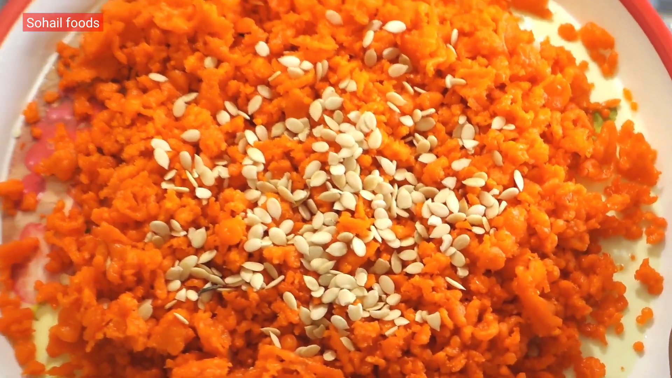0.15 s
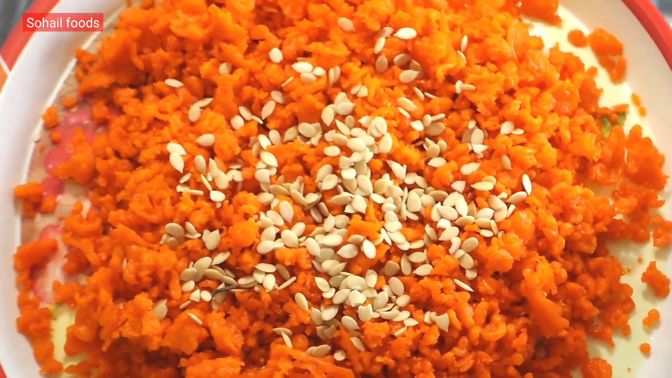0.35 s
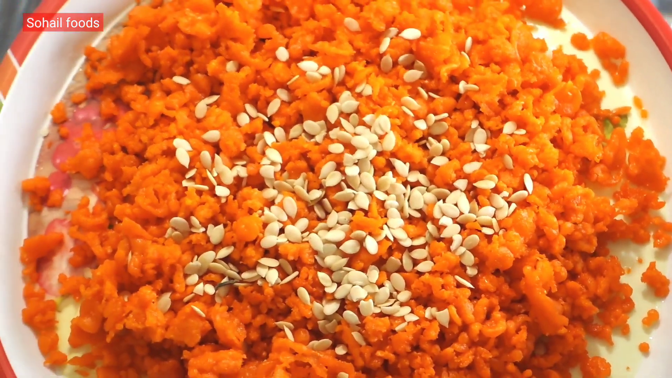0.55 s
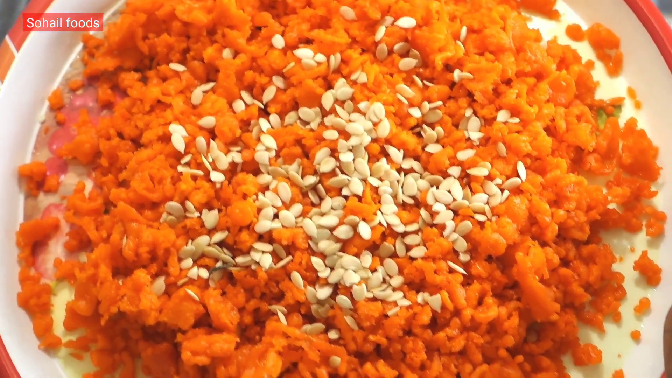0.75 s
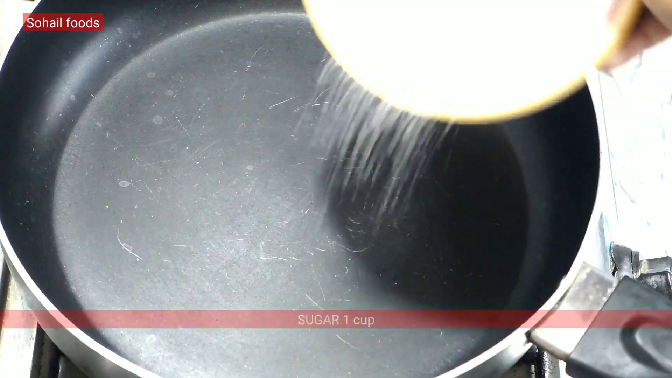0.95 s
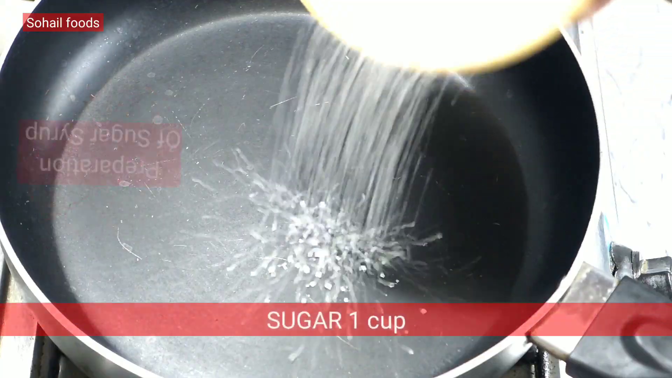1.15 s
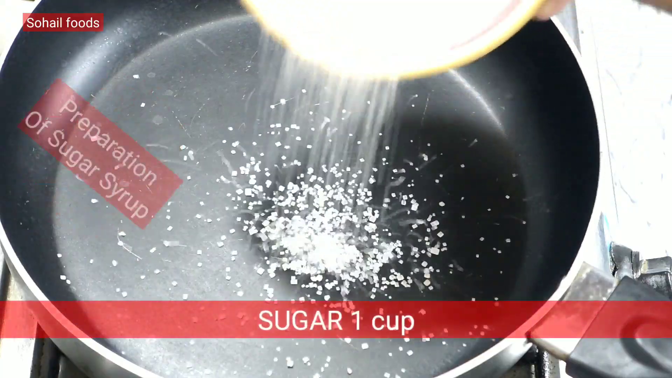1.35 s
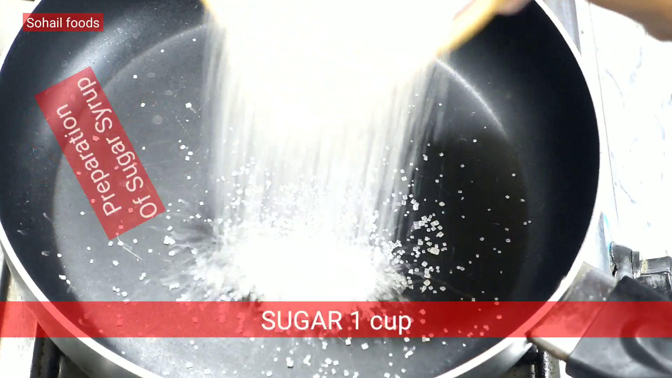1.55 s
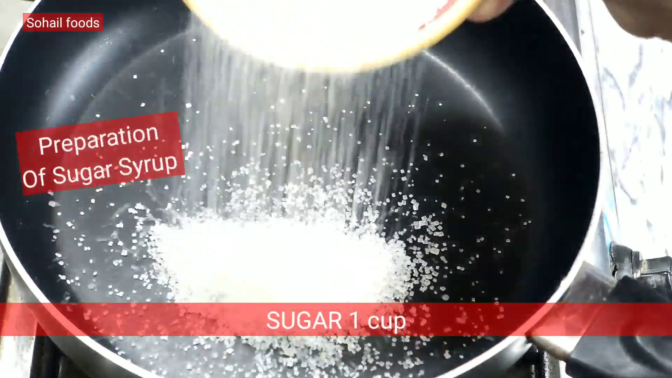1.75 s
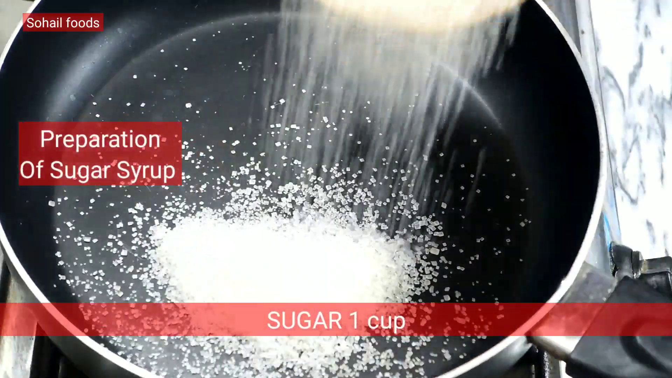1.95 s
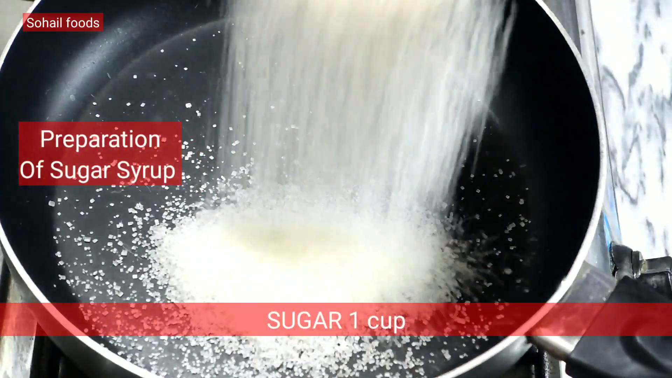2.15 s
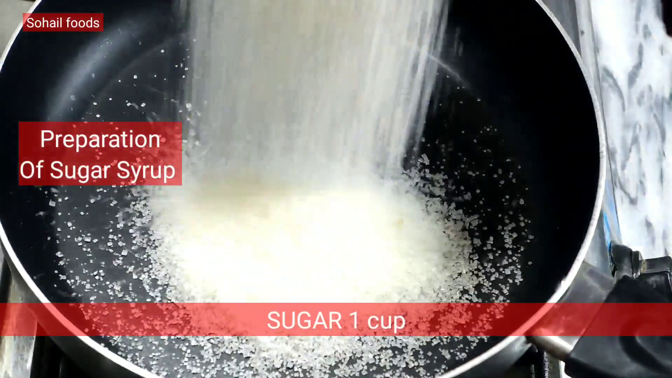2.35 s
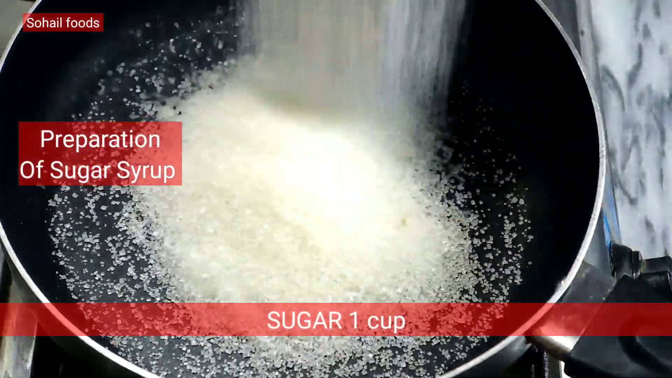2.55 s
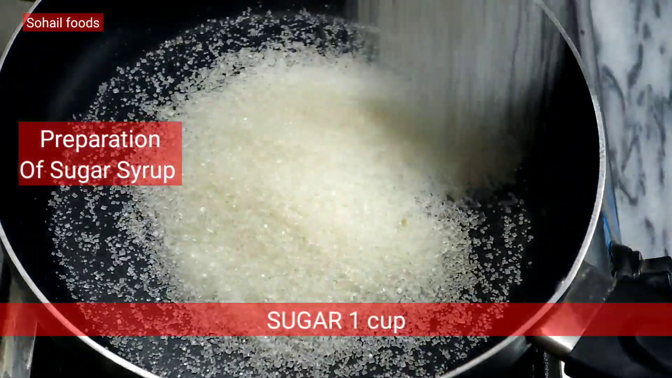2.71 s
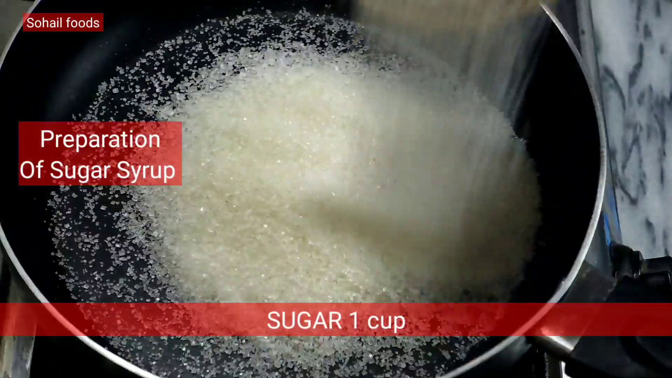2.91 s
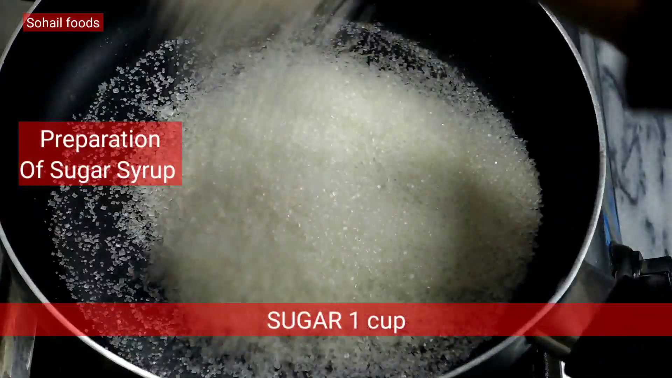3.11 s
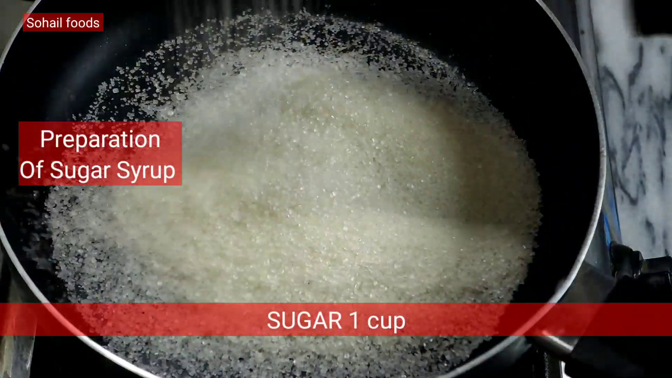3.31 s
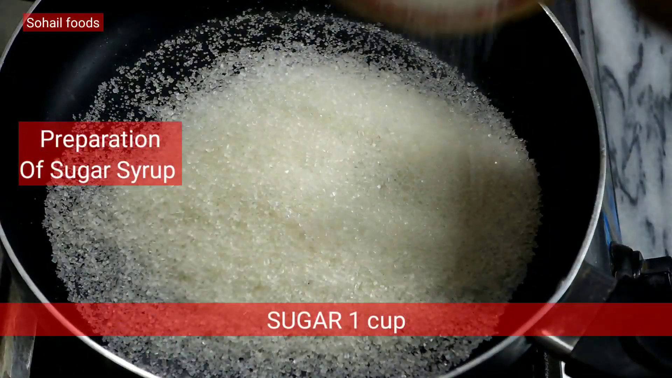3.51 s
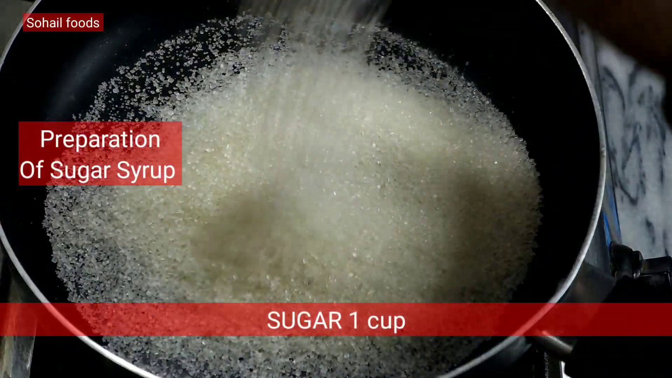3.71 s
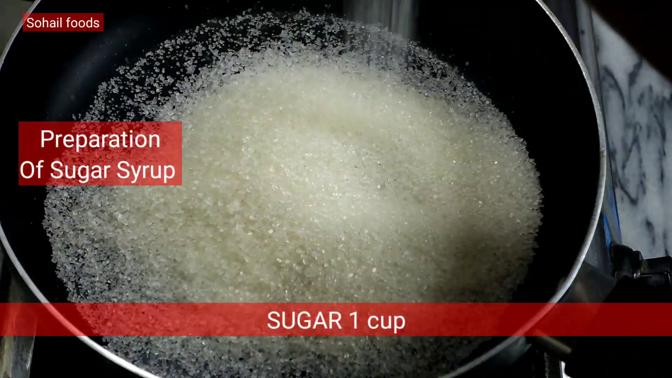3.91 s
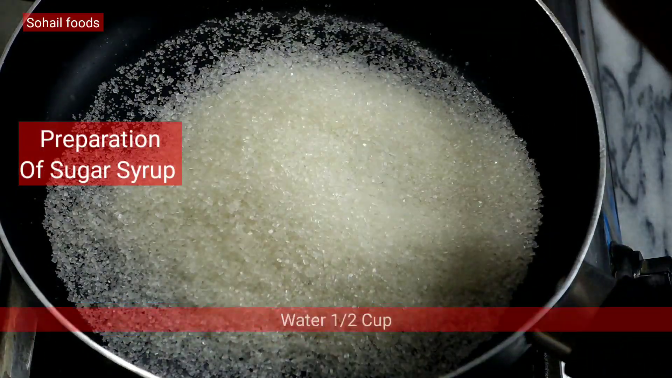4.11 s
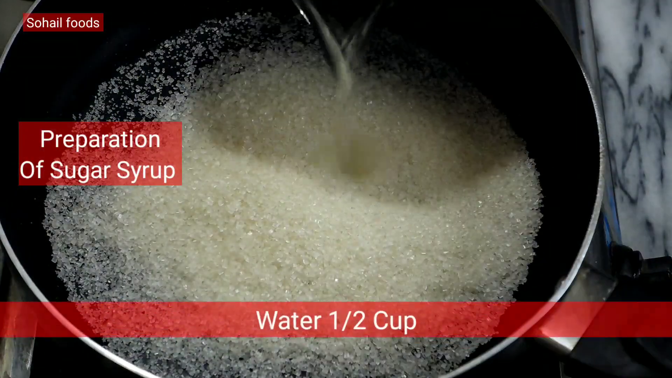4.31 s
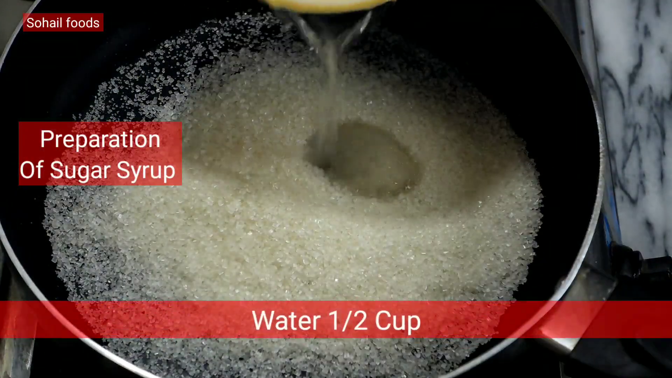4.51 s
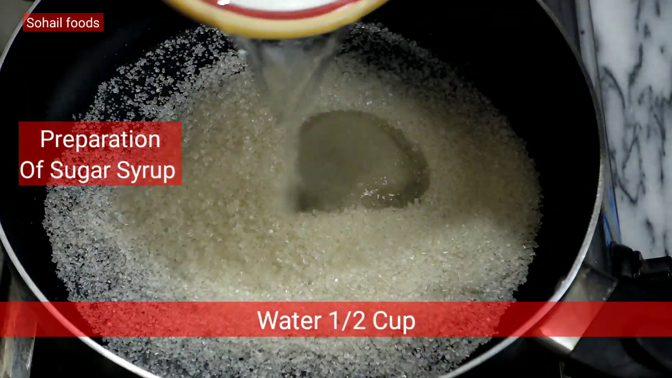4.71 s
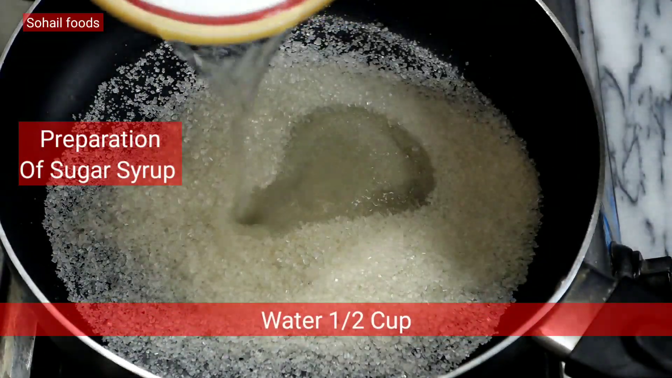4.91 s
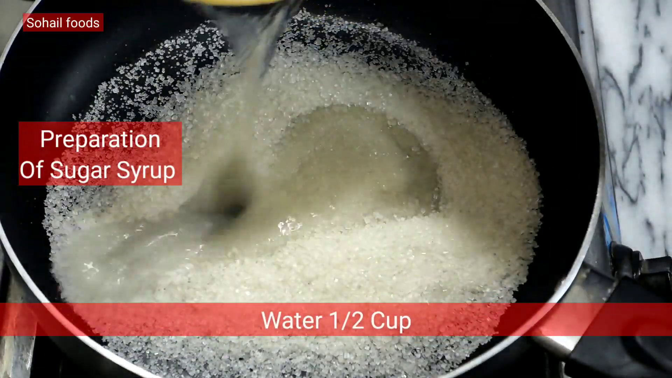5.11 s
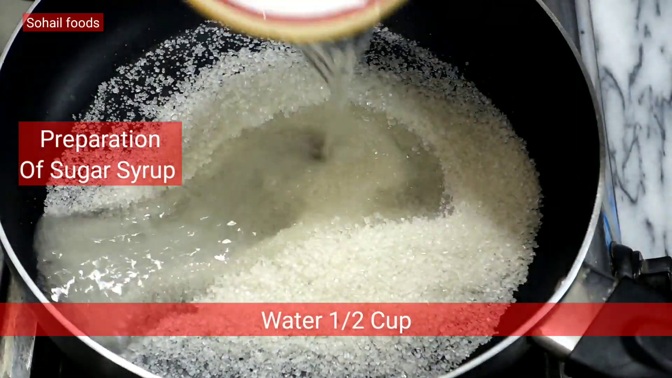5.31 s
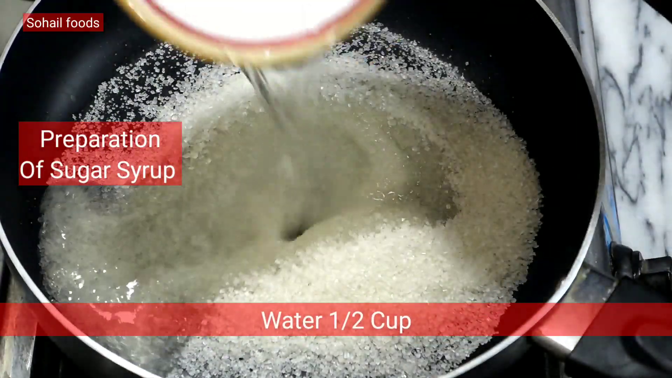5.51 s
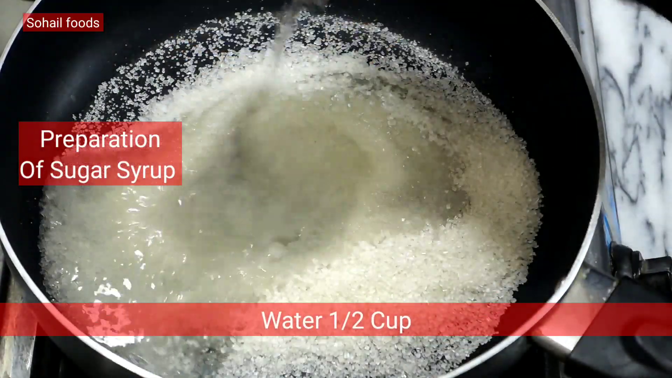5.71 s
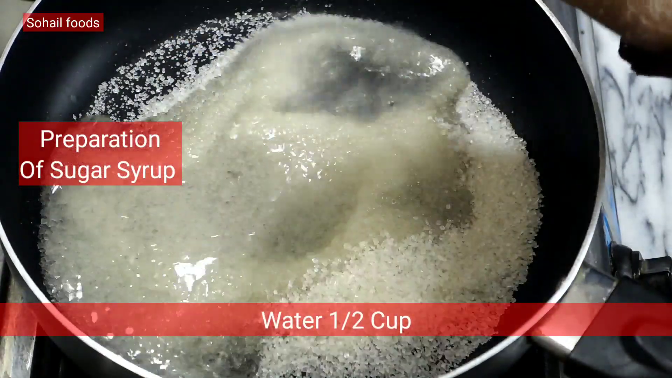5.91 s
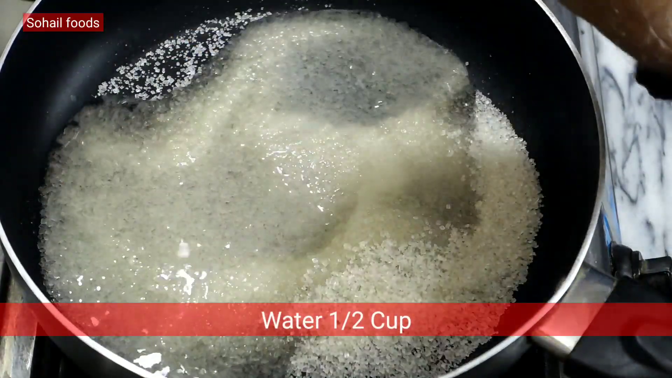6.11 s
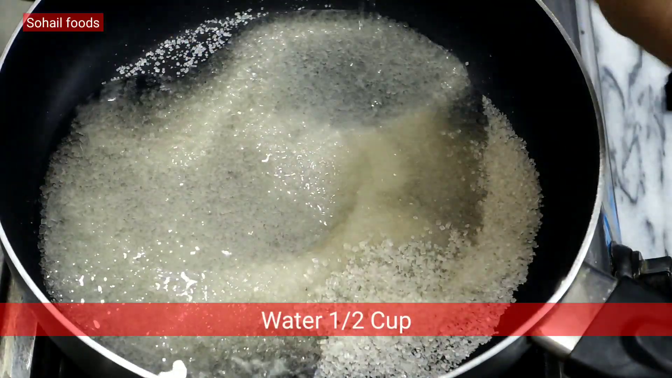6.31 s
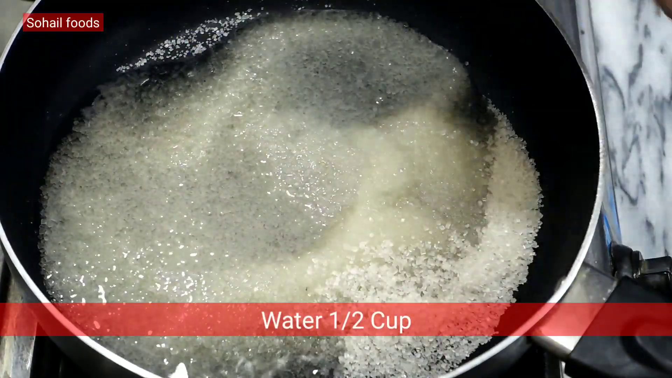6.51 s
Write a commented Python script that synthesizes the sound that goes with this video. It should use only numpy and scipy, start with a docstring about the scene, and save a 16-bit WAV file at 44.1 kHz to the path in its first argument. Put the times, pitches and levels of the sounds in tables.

```python
"""A small kitchen murmurs with moving air and a low hum, heard by a close microphone with two ports.
Granulated sugar streams into a metal pan: tiny impacts ring the bare bottom, then the heap muffles it to a hiss.
The last grains trickle over the rim of the cup. Half a cup of water follows and soaks in with a fine hiss.
Its stream spatters, slaps, traps ringing bubbles and gulps into the pool, and the loaded pan booms."""
import sys
import numpy as np
from scipy import signal
from scipy.fft import rfft, irfft, next_fast_len
from scipy.io import wavfile
from scipy.ndimage import uniform_filter1d, map_coordinates

SR = 44100
rng = np.random.default_rng(int(sys.argv[2]) if len(sys.argv) > 2 else 0)


def digitize_waveform(pressure):
    """Quantize a signal to 16-bit integers and store it at the path in sys.argv[1].

    Rows of a 2-D input are taken as channels; values are limited to [-1, 1].
    """
    field = np.atleast_2d(pressure).T
    bounded = np.clip(field, -1, 1)
    quanta = np.round(bounded * 32767).astype(np.int16)
    wavfile.write(sys.argv[1], SR, quanta)


N = 288916

# how far the two microphone ports differ for sugar: pitch_hz, side_against_mid_db
SUGAR_SIDE = [(60, -10), (150, -17), (380, -18), (950, -15), (2380, -9), (4200, -9.5), (6500, -3.5),
              (15000, 0.5)]
# strength of the water stream: time_s, level_db
STREAM = [(4.42, -44), (4.6, -47.5), (4.74, -45.5), (4.88, -42.5), (4.93, -44), (5.0, -37.5), (5.11, -43),
          (5.29, -39), (5.38, -43), (5.46, -44.5), (5.62, -34), (5.68, -44.5), (5.72, -40), (5.82, -42),
          (5.99, -36), (6.17, -31.5), (6.3, -39.5), (6.43, -36.5), (6.55, -42.5)]
# colour of the water's spatter: pitch_hz, level_db (relative, per Hz)
SPATTER_COLOUR = [(290, -37), (500, -7), (680, -6), (800, 1.5), (1300, -3.5), (1600, -23), (1800, 0),
                  (2500, -5.5), (4600, -2.5), (7400, 2.5), (10000, 0), (12000, -5), (15500, 1)]
# the hollow under the stream: time_s, pitch_hz, level_db
GURGLE = [(4.86, 393, -54), (4.99, 414.2, -41), (5.07, 405.3, -50), (5.12, 425, -47.5), (5.2, 426, -44.5),
          (5.34, 394.7, -48), (5.67, 398, -62), (5.73, 433.6, -46), (5.81, 486, -54), (5.85, 440, -54),
          (5.93, 359.4, -53), (5.99, 329, -54), (6.24, 337, -49.5), (6.29, 390.6, -65), (6.42, 432, -47),
          (6.55, 440, -51)]
# gulps of water that thump into the pool: start_s, level_db, pitch_hz
GULPS = [(4.478, -43.5, 462), (4.663, -38, 510), (4.715, -37.5, 480), (4.795, -43, 384), (4.944, -29, 355),
         (4.99, -33.5, 413.5), (5.106, -37, 430), (5.191, -32.5, 419), (5.294, -32, 396), (5.457, -26, 355),
         (5.595, -36.5, 364), (5.704, -35, 428), (5.841, -27.5, 431), (5.895, -32.5, 373), (5.94, -37, 337),
         (5.987, -34.5, 507), (6.013, -28.5, 360.6), (6.295, -29.5, 371.4)]
BOOM_HZ = 364.5  # main mode of the loaded pan
BUBBLE_RISE = 0.05  # share by which a bubble's pitch climbs as it surfaces


def amp(db):
    """Turn decibels into gain."""
    return 10 ** (np.asarray(db) / 20)


def unit(x):
    """Scale x to an rms of 1."""
    return x / np.sqrt(np.mean(x ** 2) + 1e-20)


def along(points, hz):
    """Read (Hz, value) points on a log frequency axis."""
    f, v = np.transpose(points)
    return np.interp(np.log(hz + 1), np.log(f + 1), v)


def curves(rows):
    """Give one value per sample for each column after the time."""
    s, *cols = np.transpose(rows)
    return [np.interp(np.arange(N) / SR, s, c) for c in cols]


def wobble(rate):
    """Draw a smooth random curve with this many knots a second."""
    knots = rng.standard_normal(int(N * rate / SR) + 4)
    return map_coordinates(knots, [np.arange(N) * rate / SR])


def swell(s, db, rise_s, t60):
    """Gain of one surge: it rises smoothly to its crest at time s, then falls 60 dB in t60 seconds."""
    t = np.arange(N) / SR - s
    return amp(db - 60 * np.maximum(t, 0) / t60) * np.exp(-(np.minimum(t, 0) / rise_s) ** 2)


def filtered(x, response):
    """Multiply the spectrum of x by a complex response of frequency."""
    m = next_fast_len(N + SR // 2)
    return irfft(rfft(x, m) * response(np.fft.rfftfreq(m, 1 / SR)), m)[..., :N]


def coloured(x, spectrum):
    """Shape x by a spectrum, at rms 1."""
    return unit(filtered(x, lambda hz: amp(along(spectrum, hz))))


def rung(x, modes):
    """Ring a set of resonances (Hz, width Hz, relative dB) with x, at rms 1."""
    def response(f):
        return sum(amp(db) * 1j * f * w / (c * c - f * f + 1j * f * w) for c, w, db in modes)
    return unit(filtered(x, response))


def wavering(hz, waver_hz, flutter_db):
    """A clear resonance whose pitch and strength stir a little, at rms 1."""
    phase = 2 * np.pi * np.cumsum(hz + waver_hz * wobble(50)) / SR
    return unit(amp(flutter_db * wobble(45)) * np.sin(phase))


def gliding(rows, width_hz):
    """A narrow, noisy resonance that follows (s, Hz, dB) rows."""
    hz, db = curves(rows)
    phase = 2 * np.pi * np.cumsum(hz) / SR
    return amp(db) * unit(wobble(width_hz) * np.sin(phase) + wobble(width_hz) * np.cos(phase))


def patchy(x, depth_db, size, order):
    """Let the colour keep shifting; size is the window in samples, order the frames a patch lasts."""
    z = signal.stft(x, nperseg=size)[2]
    field = rng.standard_normal(z.shape[-2:])
    field = uniform_filter1d(uniform_filter1d(field, 3, 0), order, 1)
    return unit(signal.istft(z * amp(depth_db * unit(field)), nperseg=size)[1][..., :N])


def ports(pair, side_db):
    """Left and right from a common signal and a second one in which the two ports differ."""
    def response(hz):
        return np.array([np.ones_like(hz), amp(along(side_db, hz))])
    mid, side = filtered(pair, response)
    return np.array([mid + side, mid - side])


def bounced(x, echo_db, count):
    """Sound crosses the pan and returns from its walls within a few milliseconds."""
    delay, gain = rng.uniform(.0006, .009, count), rng.standard_normal(count)
    gain = amp(echo_db) * gain / np.linalg.norm(gain)
    return x + sum(g * np.pad(x, (round(d * SR), 0))[:N] for d, g in zip(delay, gain))


def add(track, s, sound):
    """Mix a sound into the track from time s on."""
    part = track[round(s * SR):][:len(sound)]
    part += sound[:len(part)]


def kitchen():
    """Moving air and a low rumble are shaped noise; the hum of an appliance is two unsteady tones."""
    # levels of the kitchen: time_s, air_db, rumble_db
    levels = [(0, -63, -89), (0.3, -63.5, -89), (0.97, -63, -91), (1.02, -75.5, -102), (4.38, -68, -108),
              (4.45, -59, -65), (5.0, -79, -55), (6.55, -79, -54)]
    # colour of the air: pitch_hz, level_db (relative, per Hz)
    air_colour = [(35, -40), (60, -57), (170, -11.5), (330, -6), (475, 2.5), (560, -4), (810, 1),
                  (960, -3.5), (1200, 0), (1650, -10.5), (2150, -6.5), (3050, -11), (5000, -23),
                  (9000, -28), (11000, -24), (15500, -29)]
    # how far the ports differ for air: pitch_hz, side_against_mid_db
    air_side = [(200, -36), (500, -20), (1100, -12.5), (1700, -4.5), (4000, -0.5), (15000, 1)]
    # colour of the rumble: pitch_hz, level_db (relative, per Hz)
    rumble_colour = [(15, -60), (30, -19), (48, -0.5), (85, -2.5), (108, -13), (130, 6.5), (165, -8),
                     (205, -11), (260, 3), (400, -56)]
    # tones of the hum, which follows the rumble's level: pitch_hz, level_db (relative)
    hum_tones = [(97, -6.5), (124, -9)]
    air_db, rumble_db = curves(levels)
    noise = ports(rng.standard_normal((2, N)), air_side)
    air = patchy(coloured(noise, air_colour), depth_db=2.5, size=2048, order=7)
    t = np.arange(N) / SR
    hum = sum(amp(db + 2.7 * wobble(24)) * np.sin(2 * np.pi * hz * t + 1.6 * wobble(18))
              for hz, db in hum_tones)
    rumble = amp(-7.5) * coloured(rng.standard_normal(N), rumble_colour)
    return amp(air_db + 0.37 * wobble(4.6)) * air + amp(rumble_db) * (rumble + hum)


def murmur():
    """The room murmurs in uneven swells that ring its resonances, over a dull rumble that dies away."""
    # swells of the murmur: crest_s, level_db, rise_s, t60_s
    surges = [(.04, -64, 0.046, 0.85), (.17, -64, 0.089, 0.53), (.45, -66, 0.1, 0.69), (.66, -69, .04, .7),
              (.9, -69, .06, 0.45)]
    # resonances of the room: pitch_hz, width_hz, level_db (relative)
    room_modes = [(282, 17, -2.5), (480, 23, -2), (793, 14, 8), (828, 14, 1), (1100, 140, -9)]
    # one surge of dull rumble: crest_s, level_db, rise_s, t60_s
    low_surge = (-0.3, -60, -1.5, 1.8)
    # colour of the dull rumble: pitch_hz, level_db (relative, per Hz)
    low_colour = [(90, -32), (150, 0), (400, 0), (700, -34)]
    swells = np.linalg.norm([swell(*row) for row in surges], axis=0)
    tones = patchy(rung(rng.standard_normal(N), room_modes), depth_db=3.5, size=4096, order=4)
    return swells * tones + swell(*low_surge) * coloured(rng.standard_normal(N), low_colour)


def walls(x):
    """Two unrelated short answers of the room, each frequency dying at its own speed."""
    # how long the room rings: pitch_hz, t60_s
    decay = [(200, 0.48), (2000, 0.14), (12000, 0.058)]
    hz, t, z = signal.stft(rng.standard_normal((2, SR // 2)), SR, nperseg=256)
    tail = signal.istft(z * amp(-60 * t / along(decay, hz)[:, None]), SR, nperseg=256)[1]
    late = np.pad(x, (SR // 300, 0))[None]
    return signal.fftconvolve(late, tail / np.linalg.norm(tail[0]), axes=1)[:, :N]


def soaking():
    """A fine, even hiss where the water sinks between the dry crystals."""
    # strength of the soaking: time_s, level_db
    strength = [(4.32, -106), (4.39, -57), (4.5, -50.5), (4.62, -50.5), (5.0, -49.5), (6.55, -87)]
    # its colour: pitch_hz, level_db (relative, per Hz)
    soak_colour = [(300, -6), (800, 8), (3000, -6), (6000, -1), (10500, 0.5), (15500, -1.5)]
    soak_db, = curves(strength)
    return amp(soak_db) * coloured(ports(rng.standard_normal((2, N)), SUGAR_SIDE), soak_colour)


def crystals(rate):
    """A dense patter of tiny impacts of uneven size, rate a second, as the two ports hear them."""
    hits = np.sqrt(rng.poisson(rate / SR, (2, N))) * rng.standard_normal((2, N))
    return ports(hits, SUGAR_SIDE)


def exposed(t):
    """Share of the sugar stream that rings the pan floor, the pan wall and the cup rim."""
    buried_s, heaped_s = 1.284, 1.78  # the heap closes over the floor, then smothers the metal
    rim_s, rim_hold_s = 3.44, 0.23  # the last grains trickle over the cup's rim
    narrow = np.maximum(buried_s - t, 0)
    buried = np.clip((t - buried_s) / .05, 0, 1)
    heaped = np.maximum(t - heaped_s, 0)
    off_rim = np.abs(t - np.clip(t, rim_s, rim_s + rim_hold_s))
    # slopes in dB per second; the floor's ring grows while the stream widens over it
    floor_db = -4 - 31 * narrow - 3.5 * buried - 14 * heaped
    wall_db = -4.5 - 7 * heaped
    rim_db = -3.5 - 96 * off_rim
    return amp([floor_db, wall_db, rim_db])


def singing():
    """The steady rain of crystals sets one mode of the bare floor after another singing."""
    # modes struck where they swing most: start_s, length_s, pitch_hz, level_db
    sung_modes = [(1.09, 0.19, 2362, -49), (1.22, 0.073, 2362, -43), (1.35, 0.056, 2362, -56),
                  (1.158, .135, 3880, -45.5), (1.5, .08, 3880, -50.5), (1.17, 0.047, 6535, -42.5)]
    rise_s, t60_s = 0.016, 0.16
    t = np.arange(N) / SR
    out = 0
    for s, length, hz, db in sung_modes:
        fade = amp(db - 60 * np.maximum(t - s - length, 0) / t60_s)
        rise = np.clip((t - s) / rise_s, 0, 1)
        # fresh grains keep knocking the mode out of step
        out = out + fade * rise * wavering(hz, waver_hz=10, flutter_db=2.5)
    return out


def sugar():
    """Crystals hiss on the heap, ring whatever is still bare and drum on the pan bottom."""
    # the steady stream, two tips of the cup: time_s, grain_hiss_db, weight_on_pan_db
    pour = [(0.96, -58, -74), (1.052, -69.5, -62.5), (1.095, -39.5, -60.5), (1.2, -36, -53),
            (1.42, -43.5, -56.5), (1.52, -38.5, -53.5), (1.68, -38, -48.5), (1.85, -50, -50),
            (2.03, -56, -58), (2.2, -51.5, -47.5), (2.65, -48, -51), (3.02, -56.5, -57.5),
            (3.42, -59.5, -56.5), (3.62, -60.5, -60), (3.73, -60.5, -57), (4.0, -64.5, -56),
            (4.14, -73, -59), (4.35, -82, -63.5)]
    # slides of sugar shaken loose from the cup: crest_s, hiss_db, rise_s, t60_s
    slides = [(1.063, -45, 0.0033, 0.55), (2.071, -38, 0.0096, 0.51), (2.19, -39.5, 0.027, 0.52),
              (2.25, -40.5, 0.015, .45), (2.34, -43, 0.024, 0.31), (2.43, -42.5, .025, 0.28),
              (2.525, -37, 0.026, .45), (2.61, -38, 0.025, 0.53), (2.79, -47, 0.03, 0.84),
              (3.21, -50.5, 0.045, .9), (3.302, -39, 0.035, 0.15), (3.88, -58.5, 0.03, .6)]
    # colour of grains on the heap: pitch_hz, level_db (relative, per Hz)
    heap_colour = [(180, -50), (300, -54), (492, -24), (562, -38), (631, -3.5), (744, -3.5), (1000, -33),
                   (1260, -5.5), (5390, 0.5), (9930, 1.5), (15500, 1.5)]
    # colour of the stream's weight: pitch_hz, level_db (relative, per Hz)
    weight_colour = [(88, -66), (150, -48), (533, -5.5), (611, -2), (751, -3.5), (1000, 5), (1390, -1),
                     (2710, 1.5), (4940, -5.5), (9000, -37), (11700, -39), (19800, -120)]
    # the bare floor of the pan: pitch_hz, width_hz, level_db (relative)
    floor_modes = [(1012, 18, -3), (2375, 8.6, 3.5), (2585, 70, -4.5), (3094, 120, -4), (3880, 12, 4),
                   (4515, 22, 0.5), (5170, 31, -5), (5960, 22, -5), (6535, 22, 3.5), (9610, 45, 0.5),
                   (10330, 31, -5), (10800, 42, 0.5), (11760, 70, -7)]
    # the wall of the pan: pitch_hz, width_hz, level_db (relative)
    wall_modes = [(3480, 34, -3), (7760, 31, 1), (8070, 61, -2), (8580, 77, -3), (9720, 61, -1.5),
                  (9780, 60, -1.5), (10380, 70, -2), (11450, 73, 1.5), (12120, 120, -4), (12220, 60, -6),
                  (13900, 110, -3.5), (14950, 160, -8)]
    # the rim of the cup, rubbed by the last grains: pitch_hz, width_hz, level_db (relative)
    cup_modes = [(7400, 43, 2), (8950, 530, -7), (10770, 44, -3), (12300, 86, -5)]
    # the pan bottom under the heap: pitch_hz, width_hz, level_db (relative)
    bottom_modes = [(497, 9.3, 8), (648.6, 21, 11.5), (823.5, 70, 1), (1012, 34, 11.5), (1125, 60, 8.5),
                    (1632, 22, 6.5), (2057, 37, 4), (2784, 180, 3.5)]
    # the drum mode sinks as sugar weighs the pan down: time_s, pitch_hz, level_db (against the weight)
    drum_path = [(1.05, 642, -20), (1.45, 608.5, -11.5), (1.8, 534.5, -18), (2.1, 495, -9.5),
                 (2.3, 465, -14), (2.48, 405.6, -17), (2.7, 397, -23.5), (4.3, 385.6, -25)]
    hiss_db, weight_db = curves(pour)
    flow = np.linalg.norm([amp(hiss_db)] + [swell(*slide) for slide in slides], axis=0)
    t = np.arange(N) / SR
    floor, wall, rim = exposed(t)
    pouring = np.clip((t - pour[0][0]) / 0.081, 0, 1) * np.clip((pour[-1][0] - t) / 0.42 + 1, 0, 1)
    # the sugar falls in clumps that ripple its level
    clumps = amp(0.6 * wobble(70) + 0.15 * wobble(350)) * pouring
    covered = np.sqrt(np.clip(1 - floor ** 2 - wall ** 2 - rim ** 2, .1, 1))
    # the colour shifts as the stream lands on new spots
    grains = coloured(crystals(rate=60000), heap_colour)
    hiss = covered * patchy(grains, depth_db=4.0, size=1024, order=24)
    strikes = crystals(rate=1500)  # only the larger crystals set the metal ringing
    bare = amp(-2.0) * rung(strikes, floor_modes)
    ring = floor * bare + wall * rung(strikes, wall_modes) + rim * rung(strikes, cup_modes)
    drumming = patchy(rung(crystals(rate=8000), bottom_modes), depth_db=2, size=2048, order=6)
    bottom = amp(-3.0) * drumming
    rustling = patchy(coloured(crystals(rate=5000), weight_colour), depth_db=2.5, size=512, order=7)
    rustle = amp(-1.5) * np.sqrt(covered) * rustling
    body = amp(1.06 * wobble(21.935)) * (bottom + rustle + gliding(drum_path, width_hz=100))
    bright = amp(3.0) * flow * (hiss + ring) * amp([[-1.4], [1.4]])  # a little louder on the right
    return clumps * (bright + amp(weight_db) * body) + singing()


def bubble(t, hz, cycles, rise):
    """A pocket of air rings for some cycles, its pitch climbing as it nears the surface."""
    age = t * hz / cycles
    phase = 2 * np.pi * hz * t * (1 + rise * age / (1 + age))
    return np.sin(phase) * np.exp(-age) * (1 - np.exp(-t * hz / 0.74))


def spray(count, pitch_hz, pitch_spread, cycles, size_db, rise):
    """A swarm of small bubbles of random pitch, life and size, at rms 1."""
    chance, normal = rng.random((count, 2)), rng.standard_normal((count, 2))
    hz = np.clip(pitch_hz * np.exp(pitch_spread * normal[:, :1]), 600, 14000)
    life = cycles * np.exp(.3 * normal[:, 1:])
    size = amp(size_db * np.minimum(-np.log(1 - chance[:, 1:]), 2.5)) * np.sqrt(hz / pitch_hz)
    n = np.arange(SR // 60)
    place = (chance[:, :1] * N).astype(int) + n
    blips = size * bubble(n / SR, hz, life, rise) * (1 - (n / len(n)) ** 2)
    return unit(np.bincount(place.ravel(), blips.ravel(), N)[:N])


def crackle(rate, size_db):
    """Tiny droplets snap at random moments in shifting colours, a few far louder than the rest."""
    hits = (rng.random(N) < rate / SR) * rng.choice([-1, 1], N)
    size = amp(size_db * np.minimum(rng.exponential(size=N), 2.5))
    snaps = patchy(bounced(hits * size, echo_db=0, count=14), depth_db=6, size=256, order=3)
    softened = filtered(snaps, lambda hz: 1 / np.sqrt(1 + (hz / 10000) ** 4))
    return coloured(softened, SPATTER_COLOUR)


def spatter():
    """The stream breaks into fizz, babbling bubbles and ticking droplets."""
    spatter_db, = curves(STREAM)
    # the dry heap cushions the first water
    pooled = np.clip((np.arange(N) / SR - STREAM[0][0]) / 0.21, 0, 1)
    fizz = spray(count=6000, pitch_hz=5295, pitch_spread=0.404, cycles=5.1, size_db=7.0, rise=0.021)
    fizz = bounced(fizz, echo_db=-6.5, count=7)
    babble = spray(count=4200, pitch_hz=2248, pitch_spread=0.42, cycles=5.4, size_db=4, rise=BUBBLE_RISE)
    babble = bounced(babble, echo_db=0, count=9)
    droplets = coloured(rng.standard_normal(N) * amp(6.7 * wobble(280)), SPATTER_COLOUR)
    ticks = patchy(droplets, depth_db=6.0, size=256, order=4)
    snaps = crackle(rate=450, size_db=8)
    mix = amp(-4.5) * fizz + amp(-11.0) * babble + amp(-3.5) * ticks + amp(-5) * snaps
    return pooled * amp(spatter_db + 0.36 * wobble(45)) * mix


def slaps(width, rise_s, t60, crack, cycles, ping_db):
    """Each slap is a few milliseconds of spray around one pitch, in which a tiny bubble pings."""
    # the hardest slaps of water: start_s, level_db, centre_hz
    hard_slaps = [(4.5037, -25.5, 7700), (4.613, -28, 5400), (4.6473, -40, 4200), (4.662, -25, 6660),
                  (4.6997, -27, 5330), (4.7256, -33.5, 7250), (4.7561, -33, 4070), (4.787, -23, 7100),
                  (4.8594, -21.5, 5800), (4.9034, -26, 5000), (4.9443, -26, 4940), (4.991, -32, 7500),
                  (5.002, -24.5, 5760), (5.128, -24.5, 7000), (5.189, -26, 7900), (5.208, -18, 5400),
                  (5.213, -23.5, 10000), (5.241, -13.5, 4110), (5.244, -20.5, 9700), (5.2935, -16.5, 7790),
                  (5.297, -17, 4500), (5.33, -23.5, 5770), (5.3457, -21, 6200), (5.404, -24, 4030),
                  (5.4218, -19, 8200), (5.454, -25, 3970), (5.475, -21, 3900), (5.52, -19.5, 7600),
                  (5.627, -18, 6860), (5.697, -17.5, 2560), (5.7017, -8.5, 4730), (5.715, -19, 7500),
                  (5.718, -19, 4600), (5.7439, -18.5, 4530), (5.8, -22, 7760), (5.842, -19.5, 7000),
                  (5.902, -21.5, 3038), (5.978, -18, 8100), (6.013, -17.5, 8000), (6.049, -9.5, 7960),
                  (6.067, -15.5, 5960), (6.132, -17, 4850), (6.176, -16.5, 7230), (6.2, -17, 4670),
                  (6.2362, -13, 7560), (6.2886, -6, 7040), (6.372, -20, 5600), (6.395, -22, 6550),
                  (6.4253, -12.5, 8200), (6.448, -21, 3644)]
    out, t = np.zeros(N), np.arange(SR // 25) / SR
    f = np.fft.rfftfreq(len(t), 1 / SR)
    wet = 1 / np.sqrt(1 + (f / 12000) ** 6)  # water gives little at the very top
    for s, db, hz in hard_slaps:
        burst = rng.standard_normal(len(t)) * np.minimum(t / rise_s, 1) * amp(-60 * t / t60)
        burst[round(rise_s * SR)] += crack
        band = amp(-15) + np.exp(-(np.log((f + 1) / hz) / width) ** 2)
        splash = irfft(rfft(burst) * band * wet, len(t))
        ping = bubble(np.maximum(t - rise_s, 0), hz, cycles, rise=0.022)
        slap = splash / np.abs(splash).max() + amp(ping_db) * ping
        add(out, s, amp(db) * slap / np.abs(slap).max())
    return out


def rings(table, cycles, rise):
    """Every row sets one air pocket ringing, gliding up through its pitch."""
    out, t = np.zeros(N), np.arange(SR // 5) / SR
    for s, db, hz in table:
        life = cycles * np.exp(.2 * rng.standard_normal())
        add(out, s, amp(db) * bubble(t, hz * (1 - rise / 2), life, rise))
    return out


def booming(stream_db):
    """Gain of the pan's boom: the push of the stream and the slosh after each gulp."""
    full_stream_db, tuning_hz = -40.5, 45.7
    rise_s, t60_s = 0.0047, 0.74  # how fast a slosh builds up and dies
    # the boom fades faster than the spatter
    gains = [amp(-52 + 2.1 * np.minimum(stream_db - full_stream_db, 0))]
    for s, db, hz in GULPS:
        # gulps far from the main mode feed it less
        match = 1 / (1 + ((hz - BOOM_HZ) / tuning_hz) ** 2)
        gains.append(match * swell(s + rise_s, db - 10, rise_s, t60_s))
    return np.linalg.norm(gains, axis=0)


def gurgling(rate, pitch_spread, cycles, size_db):
    """Large air pockets burst one after another in the hollow, each at a pitch of its own."""
    hz, db = curves(GURGLE)
    out, t = np.zeros(N), np.arange(SR // 10) / SR
    starts = np.arange(GURGLE[0][0], (N - 2) / SR - 1 / rate, 1 / rate)
    for s, late, (pitch, size) in zip(starts, rng.random(400), rng.standard_normal((400, 2))):
        at = s + late / rate
        i = int(at * SR)
        pocket = bubble(t, hz[i] * np.exp(pitch_spread * pitch), cycles, rise=0.045)
        add(out, at, amp(db[i] + size_db * size) * pocket)
    return out


def pool():
    """The loaded pan booms, and the hollow that the stream digs gurgles at a wandering pitch."""
    # the pan weighed down by sugar and water: pitch_hz, width_hz, level_db (relative)
    loaded_modes = [(249.6, 16, -4.5), (284, 9.9, -5), (355, 136, -4), (523, 90, -11.5), (775, 60, -1.5),
                    (956, 32, -16)]
    soaked_s = 4.79  # the water has begun to reach the metal
    stream_db, = curves(STREAM)
    soaked = np.clip((np.arange(N) / SR - soaked_s) / .02, 0, 1)
    # water strikes softly: (Hz, relative dB per Hz)
    push = coloured(rng.standard_normal(N), [(150, -37), (240, 4.5), (1000, 4.0), (2000, -32)])
    # the main mode wavers as the pool moves; the other modes are weaker
    boom = wavering(BOOM_HZ, waver_hz=4.3, flutter_db=3) + amp(-8) * rung(push, loaded_modes)
    hollow = amp(-2.5) * gliding(GURGLE, width_hz=60)
    pockets = amp(-2.5) * gurgling(rate=70, pitch_spread=0.083, cycles=7.5, size_db=1.5)
    return soaked * (booming(stream_db) * boom + hollow + pockets)


def water():
    """Stream, pool, slaps, bubbles and gulps together, with everything below about 200 Hz taken out."""
    # the largest bubbles: start_s, level_db, pitch_hz
    large_bubbles = [(4.535, -28.5, 2640), (4.976, -21, 1950), (5.073, -29.5, 820), (5.213, -24.5, 800),
                     (5.25, -21, 2530), (5.282, -19, 970), (5.32, -19.5, 2650), (5.451, -22.5, 2020),
                     (5.593, -22, 2650), (5.611, -14.5, 2790), (5.64, -15, 2700), (5.653, -19, 2600),
                     (5.706, -20.5, 1380), (5.747, -16.5, 3740), (5.766, -24, 1359), (6.015, -14.5, 2452),
                     (6.174, -19, 1770), (6.213, -24.5, 894), (6.265, -18.5, 1970), (6.328, -25, 820),
                     (6.4, -19.5, 2500), (6.423, -15, 3410)]
    sharp = amp(-1) * slaps(width=0.35, rise_s=.0018, t60=0.024, crack=2.43, cycles=9.6, ping_db=-3)
    bubbles = rings(large_bubbles, cycles=4.9, rise=BUBBLE_RISE)
    bubbles = amp(-4.5) * bounced(bubbles, echo_db=-5.5, count=12)
    churn = 1 + .5 * wobble(110)
    gulps = amp(-1.5) * churn * rings(GULPS, cycles=8.2, rise=0.0092)
    highpass = signal.butter(3, 200 / (SR / 2), "high")
    return signal.lfilter(*highpass, spatter() + pool() + sharp + bubbles + gulps)


def scene():
    """Sugar, then water close to the microphone, in the kitchen."""
    # how far the ports differ for water: pitch_hz, side_against_mid_db
    water_side = [(350, -78), (650, -59), (2500, -75), (7000, -66), (15000, -67)]
    splash = water()
    room, diffuse = walls(splash)
    wet = ports(np.array([splash + amp(-19.0) * room, diffuse]), water_side)
    return kitchen() + murmur() + soaking() + sugar() + wet


def record(dry):
    """Keep nothing above the band limit of 15650 Hz."""
    return filtered(dry, lambda hz: hz < 15650)


dry = scene()
out = record(dry)
digitize_waveform(out)
```